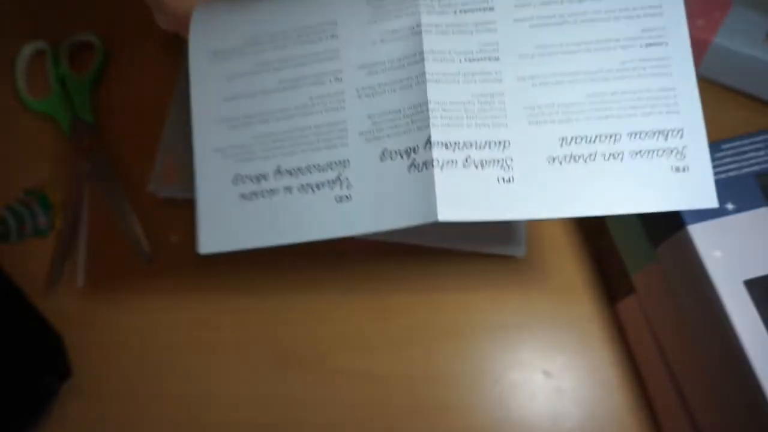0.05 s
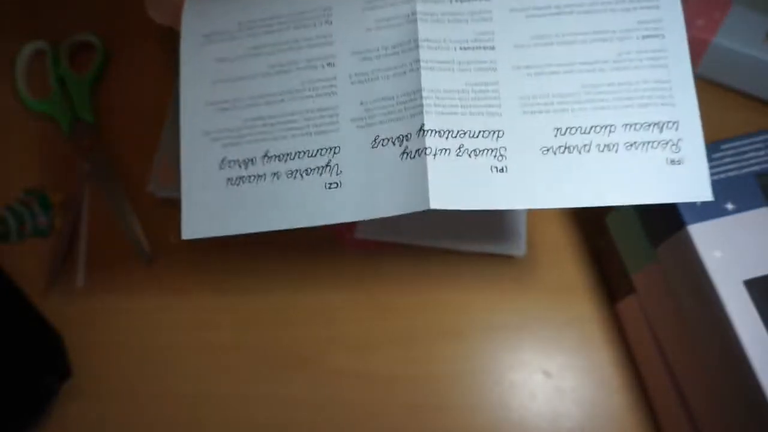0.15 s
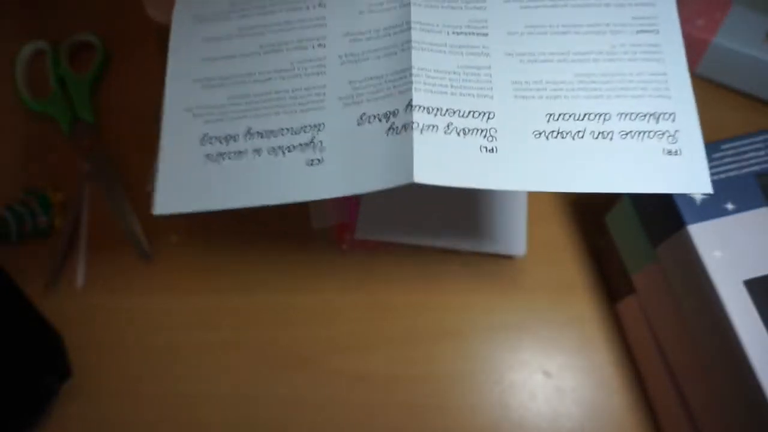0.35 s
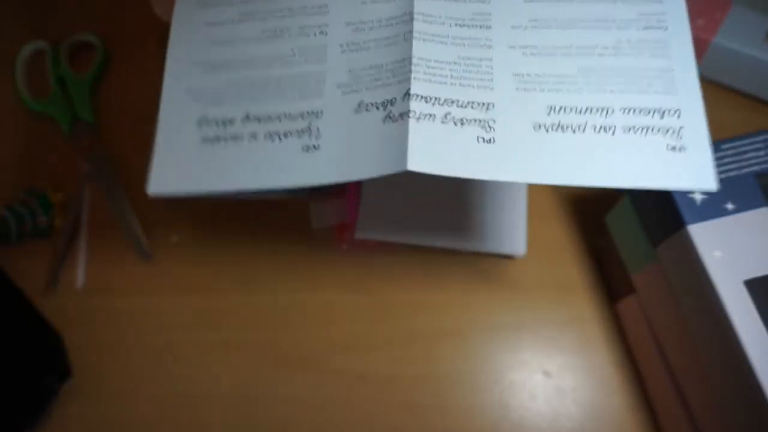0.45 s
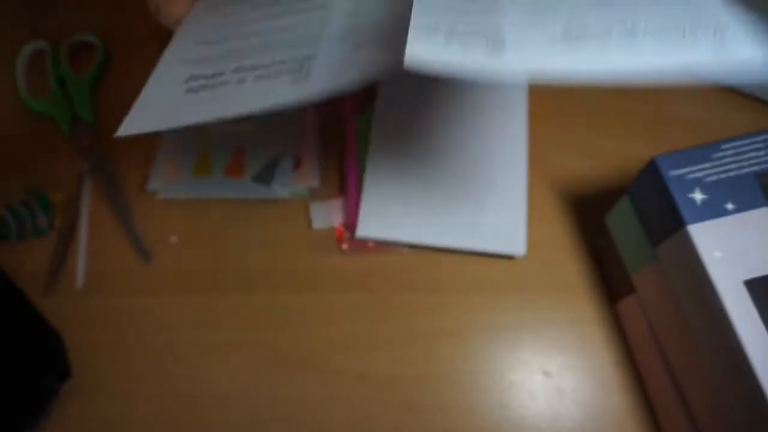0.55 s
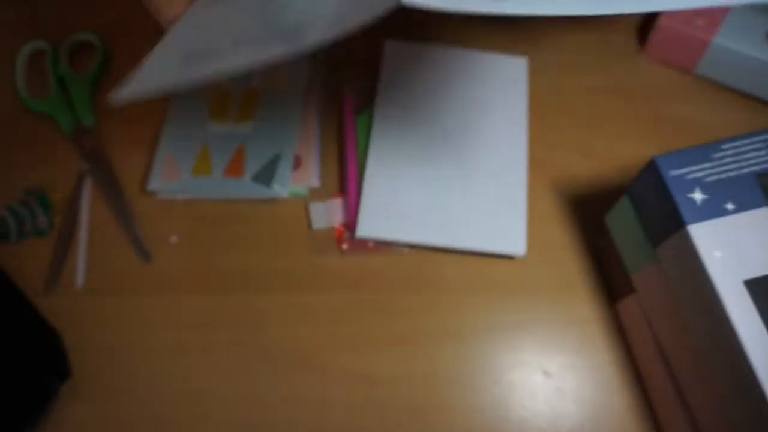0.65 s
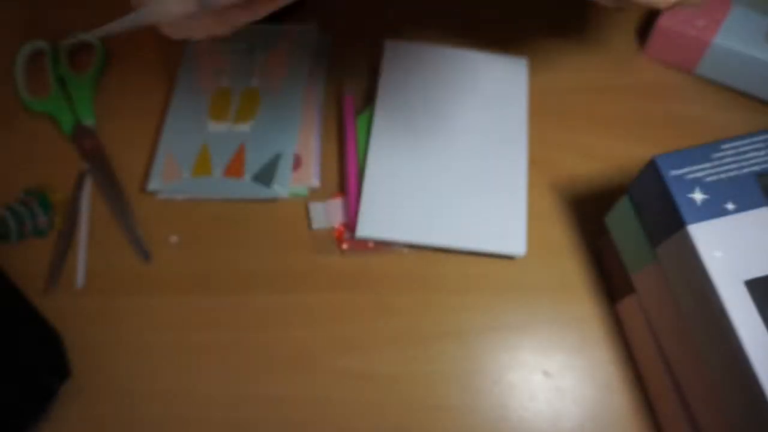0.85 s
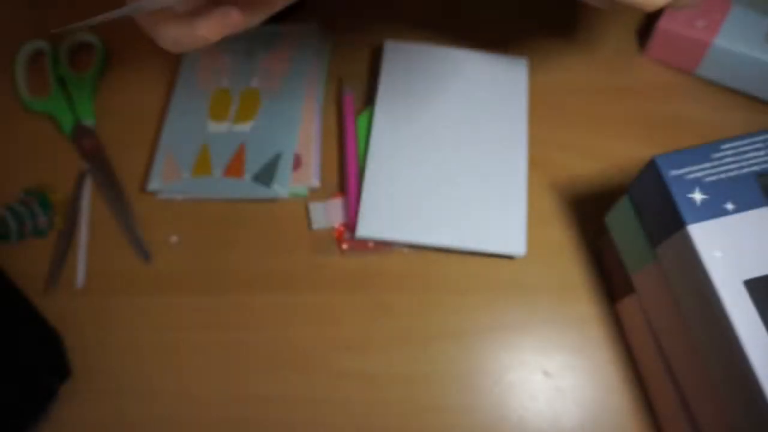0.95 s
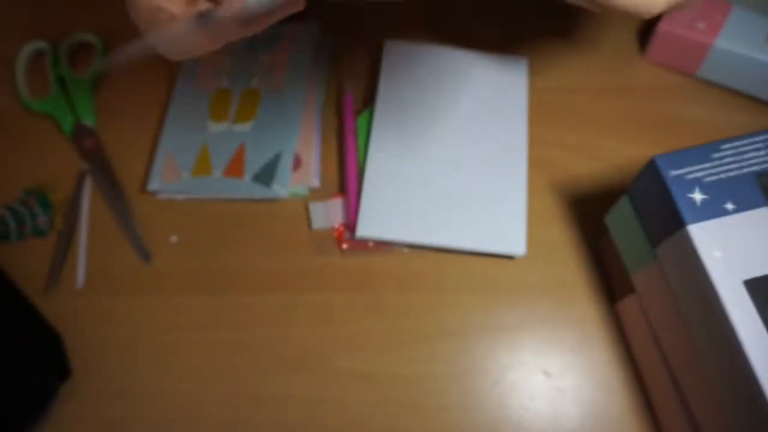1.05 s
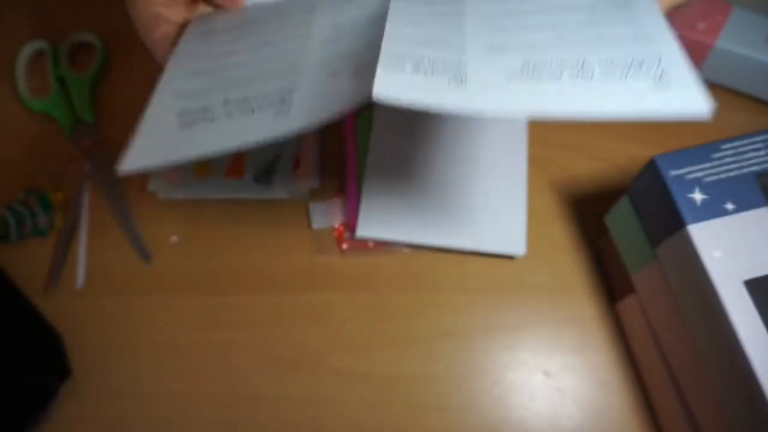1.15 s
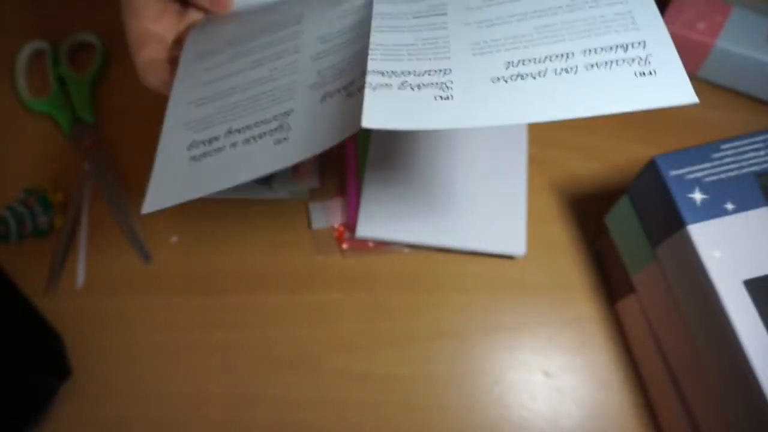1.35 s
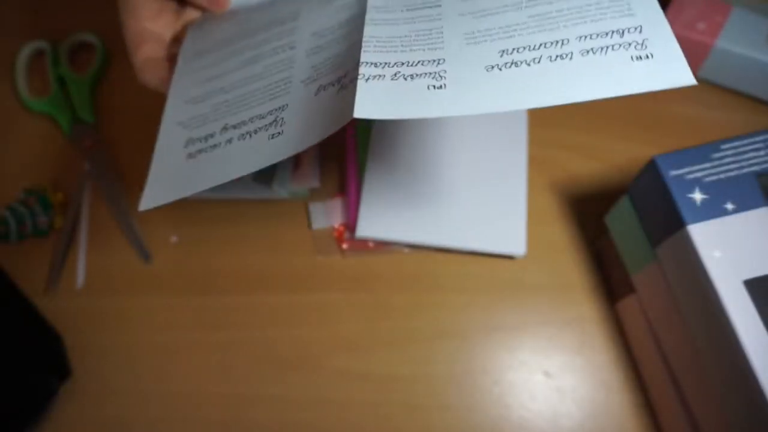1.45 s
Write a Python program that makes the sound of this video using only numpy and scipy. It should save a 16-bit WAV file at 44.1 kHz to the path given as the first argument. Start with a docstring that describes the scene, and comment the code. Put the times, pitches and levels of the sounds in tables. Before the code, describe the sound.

Paper crackles close to the microphone in a bare room. A folded sheet buckles with a quick snap, crinkles and snaps again, then rustles more and more softly with a few light taps, over a faint hiss and low hum.

```python
"""A folded paper leaflet is handled over a desk, close to a small stereo microphone in a bare room.
The buckling sheet snaps and taps: a short ring, a rattle, a treble crack and a knock of sheet and desk.
Between snaps it slides hissing through the fingers, crinkles and flexes, all as dense tiny clicks.
The room rings on over a faint hiss and a wavering low hum."""
import sys
import numpy as np
from scipy import signal
from scipy.fft import rfft, irfft, next_fast_len
from scipy.io import wavfile
from scipy.ndimage import uniform_filter1d

SR = 44100
rng = np.random.default_rng(int(sys.argv[2]) if len(sys.argv) > 2 else 0)


def unload_wav(signal):
    """Save mono or channel-first audio to the path in sys.argv[1] as 16-bit WAV at rate SR, clipped to [-1, 1]."""
    wavfile.write(
        sys.argv[1],
        SR,
        np.round(np.clip(np.atleast_2d(signal).T, -1, 1) * 32767).astype(np.int16),
    )


N = 66150

# Stereo width of paper and room: freq_hz, side_gain_db
WIDTH = [(60, -26), (200, -15), (700, -9), (2400, -6), (4400, -1.5), (8000, -7), (11000, -10), (15000, -11)]


def undb(db):
    """Decibels to amplitude."""
    return 10 ** (np.asarray(db) / 20)


def over_hz(table, hz):
    """Interpolate (freq_hz, value) rows on a log frequency axis."""
    table = np.array(table, float)
    return np.interp(np.log(hz + 1), np.log(table[:, 0]), table[:, 1])


def colour(x, table):
    """Filter by (freq_hz, gain_db) rows."""
    size = next_fast_len(x.shape[-1])
    gain = undb(over_hz(table, np.fft.rfftfreq(size, 1 / SR)))
    return irfft(rfft(x, size) * gain, size)[..., :x.shape[-1]]


def unit(x):
    """Scale to rms 1."""
    return x / np.sqrt(np.mean(x ** 2))


def stereo(mid, side, width):
    """Left and right from mid and a filtered, unrelated side."""
    side = colour(side, width)
    return np.array([mid + side, mid - side])


def ring(modes, t):
    """Sum of decaying sines."""
    return sum(undb(db - 60 * t / t60_s) * np.sin(2 * np.pi * hz * t) for hz, db, t60_s in modes)


def wobble(rate_hz):
    """Smoothed random steps, spread near 1."""
    hold = int(SR / rate_hz)
    steps = rng.standard_normal(N)[np.arange(N) // hold]
    return 1.3 * uniform_filter1d(uniform_filter1d(steps, hold), hold)


def hiss():
    """Faint steady noise, strongest in the bass."""
    # Noise floor: freq_hz, gain_db
    spectrum = [(12, -54), (20, -5), (59, -21.5), (93, -15.5), (126, -12.5), (154, -15.5), (262, -20.5),
                (497, -27.5), (1180, -31), (1400, -29.5), (15900, -38)]
    # Its stereo width: freq_hz, side_gain_db
    width = [(60, -15), (110, -10.5), (200, -8.5), (380, 3), (700, 5.5), (1290, 3.5), (2380, 1), (4400, -1),
             (8120, 0.5), (15000, -28)]
    mid, side = colour(rng.standard_normal((2, N)), spectrum)
    return stereo(mid, side, width) * undb(-60) / np.std(np.diff(mid))


def hum(waver_hz=8.7):
    """Three low tones wavering in level and phase."""
    # Hum tones: pitch_hz, rms_db
    tones = [(26.9, -60.5), (48.4, -60.5), (75.4, -61.5)]
    t = np.arange(N) / SR
    out = 0
    for hz, db in tones:
        waver = wobble(waver_hz) + 1j * wobble(waver_hz)
        out += undb(db) * unit(np.real((4.3 + waver) * np.exp(2j * np.pi * hz * t)))
    return out


def room(feed, delay_s=0.0025, build_s=0.012, modes_db=-5.5):
    """Dense reflections fading band by band, plus a few standing modes."""
    # Reverberation time: freq_hz, t60_s
    decay = [(150, 0.69), (400, 0.3), (1040, 0.58), (2760, 0.39), (7280, 0.61)]
    # Reflection spectrum: freq_hz, gain_db
    spectrum = [(150, -1.5), (250, -2.5), (450, 4), (1000, -1.5), (1600, -1.5), (2400, -0.5), (3300, -0.5),
                (4200, -1.5), (6500, -4), (10000, -4), (14000, -6)]
    # Standing modes: freq_hz, level_db, t60_s
    modes = [(120, -3, 0.46), (227.9, -13.5, 0.37), (417.4, -1, 0.33), (522.7, -17, 0.53), (600, -16, 0.29),
             (761, -14, 0.42), (900, -3.5, 0.14), (1002, -12.5, 0.35)]
    t = np.arange(SR) / SR
    noise, tail = rng.standard_normal((2, SR)), 0
    for hz in 100 * 2 ** np.arange(0, 7.5, .5):  # half-octave bands
        band = signal.butter(2, [hz / 2 ** .25, hz * 2 ** .25], "band", fs=SR, output="sos")
        fade = undb(over_hz(spectrum, hz) - 60 * t / over_hz(decay, hz))
        tail += signal.sosfilt(band, noise) * fade
    mid, side = tail / np.sqrt(np.sum(tail[0] ** 2))
    standing = ring(modes, t)
    mid += undb(modes_db) * standing / np.sqrt(np.sum(standing ** 2))
    onset = 1 - np.exp(-np.maximum(t - delay_s, 0) / build_s)
    return signal.fftconvolve(stereo(mid, side, WIDTH) * onset, feed[None], axes=1)[:, :N]


def grains(spectrum, level_db, rate_hz, spread_db, tail_s=0.0086, flicker_db=1.24):
    """Dense uneven clicks with short noisy tails, coloured by the paper; the level flickers."""
    hits = rng.random(N) < rate_hz / SR
    size_db = spread_db * np.minimum(rng.exponential(size=N), 3)
    power = signal.lfilter([1], [1, -np.exp(-1 / (tail_s * SR))], hits * undb(size_db) ** 2)
    mid, side = colour(np.sqrt(power) * rng.standard_normal((2, N)), spectrum)
    gain = undb(level_db + flicker_db * wobble(rate_hz=40.46))
    return stereo(mid, side, WIDTH) / np.std(mid) * gain


def rustle():
    """Fingers slide over the sheet, which crinkles and flexes."""
    # Handling levels: time_s, slide_db, crinkle_db, flex_db
    handling = [(0.097, -120, -93, -74), (.15, -71, -66, -63.5), (.205, -84, -60.5, -61),
                (.24, -73, -60, -42.5), (.29, -80, -51.5, -46), (0.329, -73, -44, -58),
                (0.386, -61, -62, -52), (0.401, -54.5, -44.5, -45), (0.44, -42.5, -43.5, -65),
                (0.439, -53, -31.5, -40), (0.489, -41.5, -34.5, -48), (0.548, -42, -42.5, -59.5),
                (0.609, -44, -48, -46.5), (0.649, -57, -56, -66), (0.685, -41, -50.5, -54),
                (0.7, -52, -49, -47.5), (0.708, -41.5, -49.5, -54.5), (.765, -49, -51.5, -50),
                (0.791, -52.5, -56.5, -71), (.87, -57, -60.5, -59), (.934, -55.5, -59, -59),
                (0.961, -67, -68, -69), (1.025, -60, -61.5, -60), (1.085, -70, -71.5, -64),
                (1.12, -62, -72, -71), (1.2, -68, -66.5, -63.5), (1.301, -71, -61, -62.5),
                (1.37, -71, -72, -66.5), (1.42, -90, -83, -55), (1.461, -86, -107, -81),
                (1.5, -105, -90, -81)]
    # Sliding hiss: freq_hz, gain_db
    slide = [(1500, -27), (2500, -8), (4000, 0), (6000, -2.5), (8000, -1), (11000, 0.5), (14000, -3.5),
             (16000, -5.5)]
    # Crinkle: freq_hz, gain_db
    crinkle = [(150, -35), (500, -14.5), (1100, -7), (1800, 0), (2600, 0.5), (3800, -5), (5500, -7),
               (9000, -15.5)]
    # Flexing rumble: freq_hz, gain_db
    flex = [(70, -35), (140, -9), (250, -5), (410, -0.5), (470, -1.5), (580, 4.5), (750, -6.5), (900, -1),
            (1080, -10), (1500, -17.5), (3000, -26)]
    t = np.arange(N) / SR
    time_s, *levels_db = np.array(handling, float).T
    slide_db, crinkle_db, flex_db = (np.interp(t, time_s, db, left=-120) for db in levels_db)
    return (grains(slide, slide_db, rate_hz=22000, spread_db=14)
            + grains(crinkle, crinkle_db, rate_hz=18000, spread_db=-16)
            + grains(flex, flex_db, rate_hz=3600, spread_db=1))


def sheet_ring(t, pitch_hz, ring_cycles, sag_cycles=0.32, sag_share=0.42, rise_cycles=0.29):
    """The snapped sheet rings a few cycles, starting sharp and sagging to its pitch."""
    cycles = pitch_hz * t
    phase = cycles - sag_share * sag_cycles * np.expm1(-cycles / sag_cycles)
    envelope = np.exp(-(cycles / ring_cycles) ** 2) * (1 - np.exp(-cycles / rise_cycles))
    return np.sin(2 * np.pi * phase) * envelope


def snaps(crack_s=0.001, crack_band_hz=(3860, 12300), rattle_s=0.002, rattle_rise_s=0.0001):
    """The buckling sheet rings, rattles, cracks and knocks. Returns left, right, room feed."""
    # Snaps: start_s, level_db, pitch_hz, ring_cycles, knock_db, rattle_db, crack_db, pan_db
    # Knock, rattle and crack are relative to level_db; pan is left minus right.
    events = [(0.2097, -13.5, 1604, 3.1, 0, -1, -22, -2.5),
              (0.21105, -16.5, 1840, 0.94, -7.5, -8, -23, 5.5),
              (.2149, -13, 2380, 2.9, -4, -1.5, -47.5, -3), (0.21835, -5.5, 2544, 1.7, -13.5, -3, -47, 0.5),
              (0.2402, -26, 1600, 1.2, 0.5, -16, -41, 10), (0.3971, -34.5, 1970, 4.5, -33, -5, -25, -3),
              (0.401, -52, 2300, 2.2, -32, -14, -22, 0), (.45448, -4.5, 2970, 1.07, -25, -10, -24.5, 3),
              (.45512, -14.5, 2467, 3.34, -46, -5.5, -34, -8), (0.4575, -25, 1560, 2.74, -32, -3, -28, -16),
              (0.4657, -28.5, 2840, 3, -6.5, -21, -41, -12), (.635, -47, 810, 1.4, -4, -2, -18, 4),
              (0.6852, -44, 690, 3.4, -5, 6, 2, -3), (0.7017, -27.5, 2600, 2.05, -10.5, -19, -30, -3),
              (.735, -44, 523, 4.4, -6, -12, -27, -2), (.748, -45, 610, 1.8, -13, -6, -30, 0),
              (.760, -47, 879, 6.9, -7, -12, -30, -1), (.926, -53, 625, 4, 1, -16, -30, -2),
              (0.9933, -45.5, 2010, 2.1, 3, -12, -5, 1.5), (1.1003, -41.5, 4400, 1.8, -8, -4, -1, -6),
              (1.1012, -40, 615, 1.45, -6.5, -1.5, -17, -3), (1.145, -47, 4020, 1.4, -6, -7.5, -10, 3.5),
              (1.342, -52, 2430, 1.7, 8.5, -18, 3, 0), (1.3921, -46, 4800, 1.1, -8, -3, -1.5, 10.5),
              (1.4029, -50, 5000, 1.9, -1, -14, -1, -8), (1.417, -50, 5000, 1.4, -9, -6, -4, 6),
              (1.421, -48.5, 1770, 1.6, -7, -4, -6.5, 20)]
    # Broad resonances of sheet and desk top: freq_hz, level_db, t60_s
    knock_modes = [(214, -11, 0.045), (319, -1.5, 0.054), (398.6, -2.5, 0.042), (482, -4.5, 0.059),
                   (942, -2, 0.049), (1439, 1, 0.027)]
    # Sheet rattle: freq_hz, gain_db
    rattle_spectrum = [(300, -0.5), (900, -10.5), (1700, -2), (2600, 1), (3800, -5.5), (5500, -15),
                       (8000, -22), (13000, -65)]
    length, low_cut_hz = 4096, 246
    out, t = np.zeros((3, N + length)), np.arange(length) / SR
    knock = ring(knock_modes, t)
    knock /= np.abs(knock).max()
    crack_band = signal.butter(2, crack_band_hz, "band", fs=SR, output="sos")
    crack_env = np.exp(-t / crack_s)
    rattle_env = np.exp(-t / rattle_s) - np.exp(-t / rattle_rise_s)
    for start_s, level_db, pitch_hz, ring_cycles, knock_db, rattle_db, crack_db, pan_db in events:
        noise = rng.standard_normal((3, length))
        tone = sheet_ring(t, pitch_hz, ring_cycles)
        crack = unit(signal.sosfilt(crack_band, noise[0]) * crack_env) * np.std(crack_env)
        rattle = stereo(*colour(noise[1:], rattle_spectrum), WIDTH) * rattle_env
        rattle = undb(rattle_db) * unit(rattle) * np.std(rattle_env) / 2
        impact = undb(crack_db) * crack - undb(knock_db) * knock
        direct = undb([[pan_db / 2], [-pan_db / 2]]) * (impact + rattle - tone)
        room_feed = impact + undb(6) * rattle.mean(0) - undb(-0.5) * tone
        i = int(start_s * SR)
        out[:, i:i + length] += undb(level_db) * np.vstack([direct, room_feed])
    return signal.sosfilt(signal.butter(4, low_cut_hz, "high", fs=SR, output="sos"), out[:, :N])


def scene():
    """Close paper and its reverberation over hiss and hum."""
    hits, paper = snaps(), rustle()
    room_feed = undb(-5.5) * hits[2] + undb(-12) * paper.mean(0)
    return hits[:2] + paper + room(room_feed) + hiss() + hum()


def record(dry):
    """Steep low-pass."""
    cutoff_hz = 15880
    return signal.sosfilt(signal.ellip(12, .2, 80, cutoff_hz, fs=SR, output="sos"), dry)


dry = scene()
out = record(dry)
unload_wav(out)
```